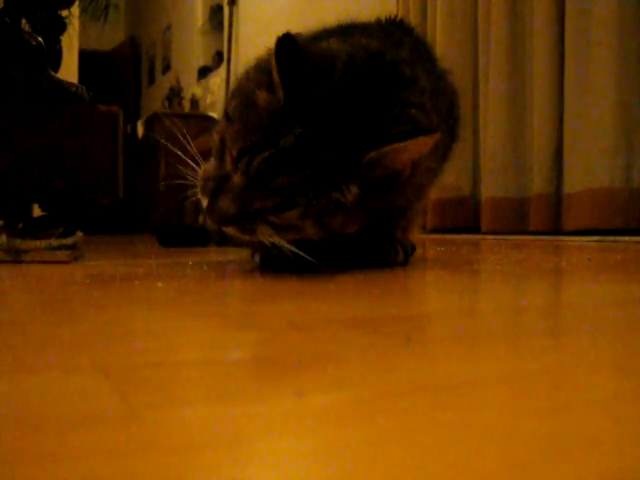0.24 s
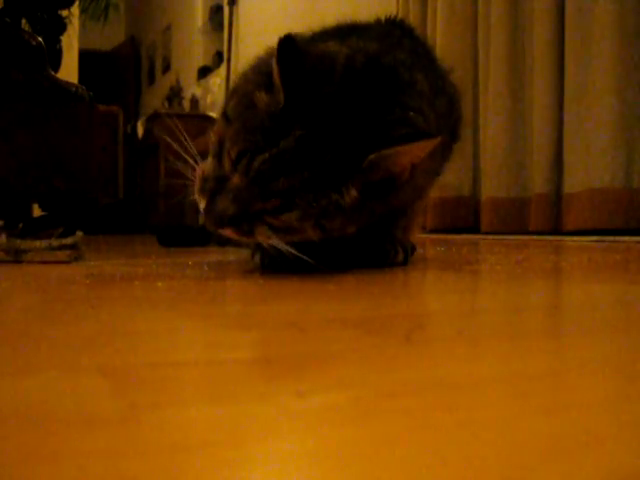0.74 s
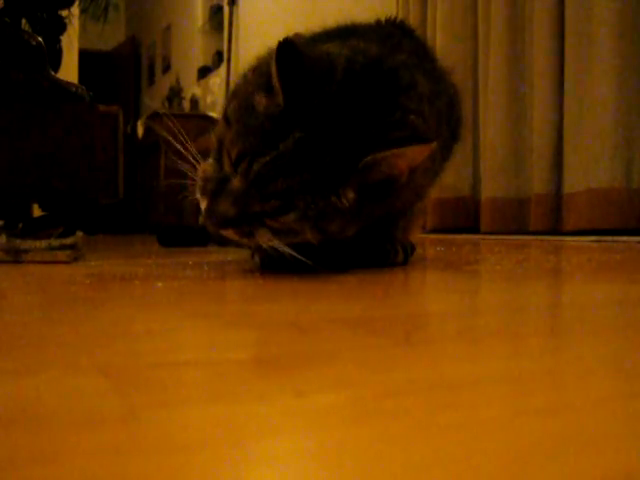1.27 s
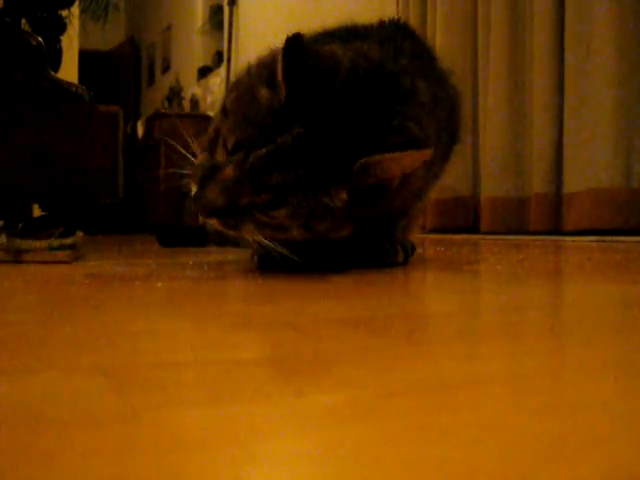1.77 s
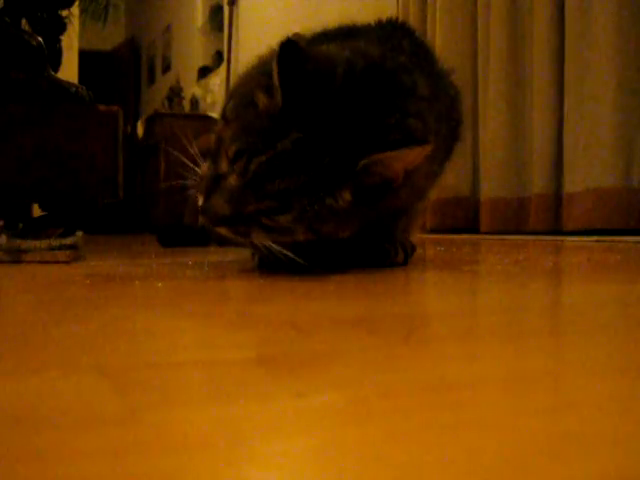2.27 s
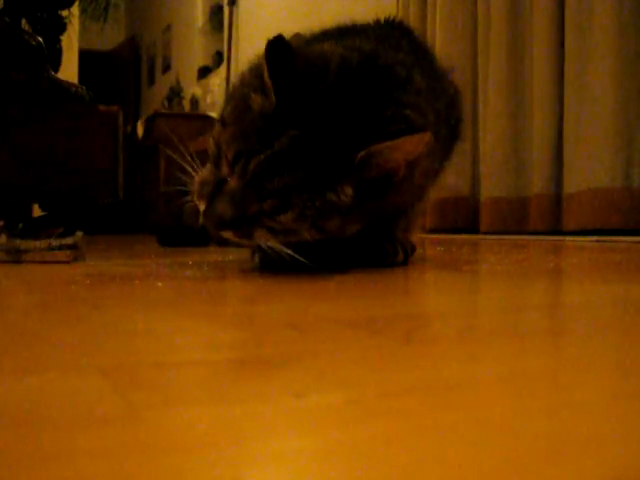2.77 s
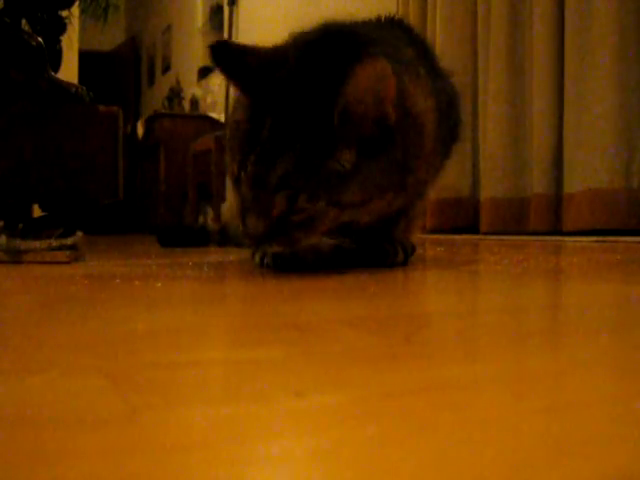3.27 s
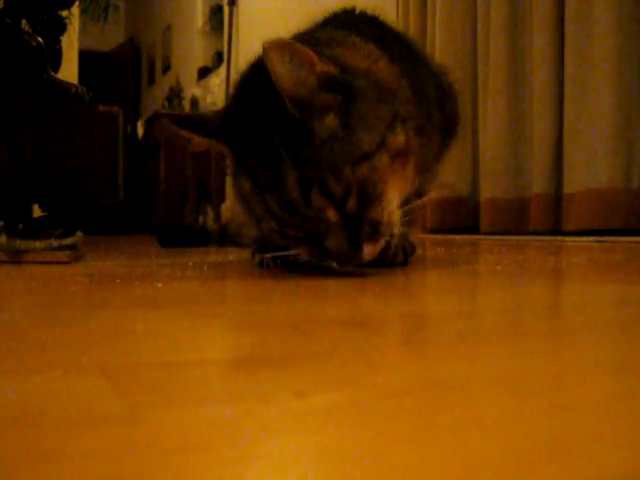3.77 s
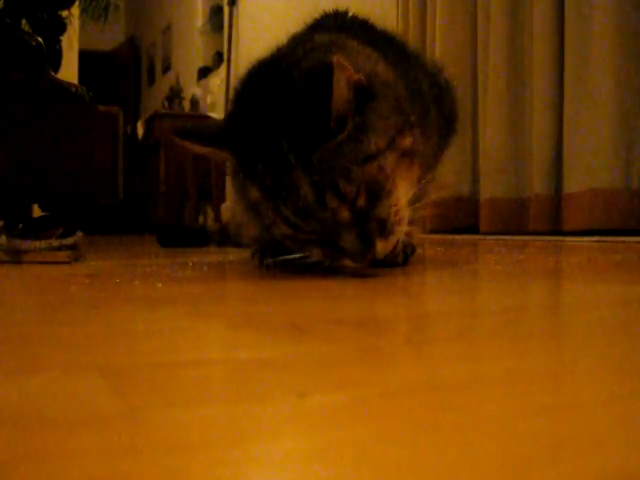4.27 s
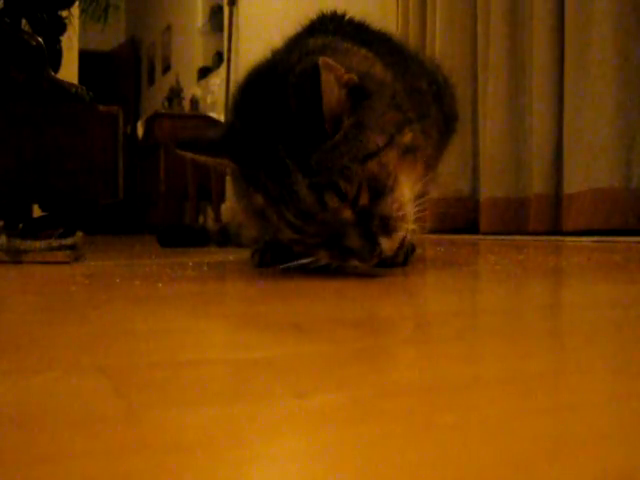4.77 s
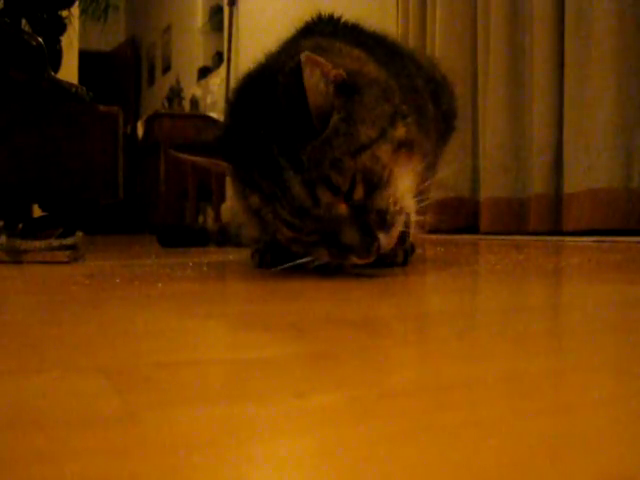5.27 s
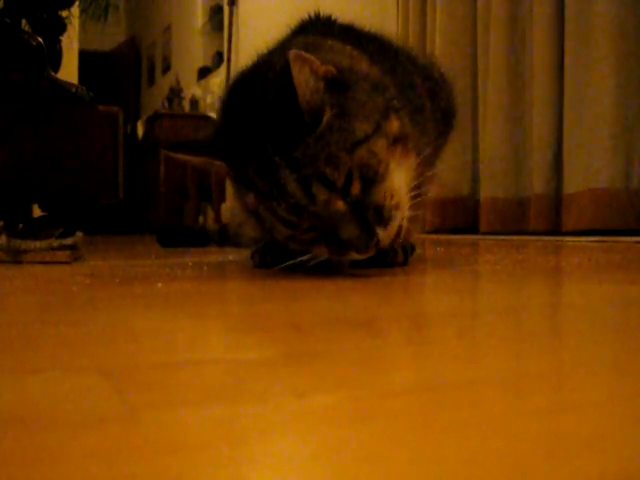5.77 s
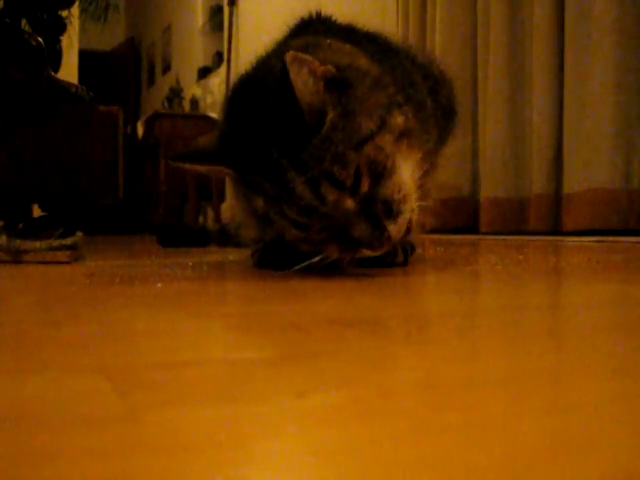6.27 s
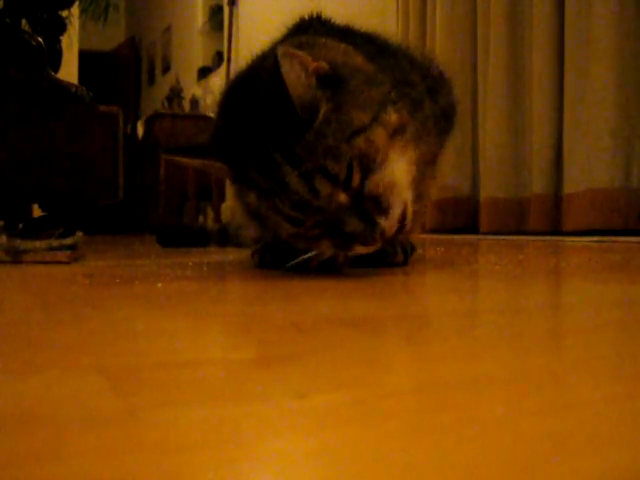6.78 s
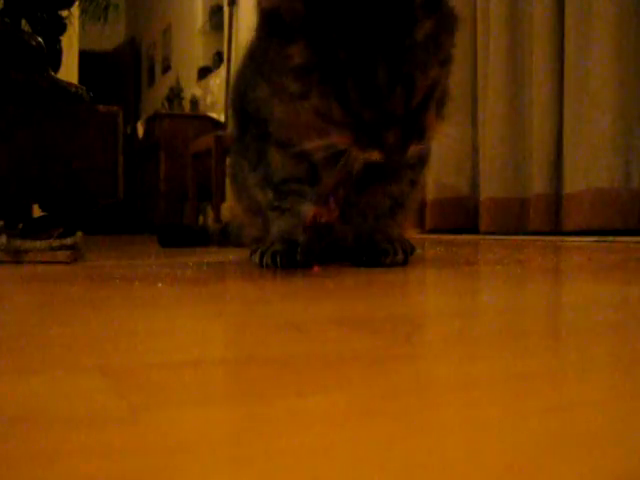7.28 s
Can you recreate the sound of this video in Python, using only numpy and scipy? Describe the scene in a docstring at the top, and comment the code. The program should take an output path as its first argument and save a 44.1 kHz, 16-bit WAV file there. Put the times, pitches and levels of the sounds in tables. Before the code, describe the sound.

Close, irregular wet chewing with brittle bone cracks and soft knocks, a brief early rub on floorboards, and low-grade steady hiss in a quiet room.

```python
"""A quiet room with a wooden floor; a cat chews its prey, close enough that direct sound outweighs the room.
Two or three bites a second: random clicks ringing the mouth make the wet crackle, small snaps the splinters.
Louder bones snap as one impulse among crumbling splinters; under some, the overloaded microphone thumps.
Jaw and prey knock softly; early on the prey rubs over the boards: dense little slips ring boards and fur.
Dull room noise with a faint whine lies under it; a small 8-bit camera adds a faint, gritty hiss."""
import sys
import numpy as np
from scipy import signal
from scipy.fft import rfft, irfft
from scipy.io import wavfile

SR = 44100
rng = np.random.default_rng(int(sys.argv[2]) if len(sys.argv) > 2 else 0)


def digitize_waveform(pressure):
    """Quantize a signal to 16-bit integers and store it at the path in sys.argv[1].

    Rows of a 2-D input are taken as channels; values are limited to [-1, 1].
    """
    field = np.atleast_2d(pressure).T
    bounded = np.clip(field, -1, 1)
    quanta = np.round(bounded * 32767).astype(np.int16)
    wavfile.write(sys.argv[1], SR, quanta)


N = 331632

# Levels are at the microphone, before the camera; those of sounds from the cat are also before the room.
# squeezes of the jaws: [start t/s, end t/s, crackle level/dB]
BITES = [(0.0, 0.109, -51), (0.401, 0.48, -52), (0.59, 0.709, -47.5), (1.138, 1.309, -49.5),
         (1.78, 1.901, -51.5), (1.978, 2.128, -56), (2.33, 2.461, -51.5), (3.001, 3.119, -51.5),
         (3.69, 3.867, -55.5), (3.87, 3.948, -48), (4.081, 4.139, -52.5), (4.201, 4.34, -50.5),
         (4.549, 4.798, -53.5), (4.871, 5.097, -54.5), (5.212, 5.29, -51.5), (5.579, 5.73, -53),
         (6.039, 6.221, -54.5), (6.521, 6.585, -53.5), (6.723, 6.827, -54.5), (7.249, 7.321, -55)]
# bones that break loudly: [break t/s, crumbling time/ms, mouth f/Hz, mouth level/dB, crack f/Hz, crack level/dB]
BONE_SNAPS = [(0.0615, 2.2, 1800, -37.5, 2820, -35.5), (0.4061, 0.11, 2100, -39.5, 3530, -51),
              (0.4879, 0.16, 1740, -47, 4300, -38), (0.6267, 1.7, 1905, -34.5, 2930, -50),
              (0.6391, 3.2, 2070, -34.5, 2800, -35.5), (0.662, 1.5, 1626, -33, 2900, -29.5),
              (0.6702, 0.43, 2000, -41, 3970, -37.5), (0.9739, 1.9, 2030, -39.5, 3430, -36.5),
              (1.1042, 0.22, 2200, -56, 3970, -36), (1.1515, 0.85, 2050, -33, 4320, -30.5),
              (1.1629, 2.3, 1770, -41, 4300, -36), (1.2382, 0.13, 1740, -46, 4190, -33.5),
              (1.2593, 1.14, 1410, -38.5, 4040, -36), (1.6914, .1, 2120, -40, 3200, -34.5),
              (1.86, 1.05, 1705, -24.5, 2880, -31.5), (1.9141, .25, 2000, -24.5, 2890, -22.5),
              (2.2721, .3, 2190, -49.5, 3980, -36.5), (2.3409, 0.091, 1760, -43, 3650, -40),
              (2.3733, 0.44, 1710, -44.5, 4260, -28), (2.4133, 0.96, 2030, -42, 3810, -38),
              (2.891, 0.084, 2480, -57, 3490, -35), (2.9, 0.097, 1830, -37, 2700, -52),
              (2.9622, 0.22, 1240, -37, 2780, -45.5), (3.0309, 1.07, 1950, -23, 4700, -34),
              (3.0915, 0.32, 2060, -36.5, 4750, -34.5), (3.2846, 1.1, 2090, -37, 5630, -33),
              (3.4763, 0.78, 1766, -33, 3520, -41), (3.7088, 0.84, 1850, -36, 3390, -39.5),
              (3.7819, 1.1, 1880, -38.5, 2660, -47), (3.8818, 1.74, 1785, -29.5, 3780, -26),
              (4.0588, 0.087, 2260, -42, 3220, -36.5), (4.2139, .4, 1750, -36, 3700, -50),
              (4.2959, 0.18, 1450, -42, 4620, -29.5), (4.566, .1, 2190, -40.5, 3730, -36),
              (4.7313, 0.16, 1800, -56, 4710, -33), (4.9803, 0.084, 1325, -37, 3100, -45.5),
              (5.0337, .3, 1790, -38.5, 5930, -36.5), (5.0473, 0.086, 1840, -39, 4660, -36.5),
              (5.0801, 1.3, 1850, -39.5, 4700, -35), (5.1134, .25, 2000, -25, 4630, -41),
              (5.2203, 1, 2075, -31.5, 2680, -34.5), (5.2336, 0.34, 2410, -44, 2840, -32),
              (5.2615, 0.74, 1450, -44.5, 3370, -42), (5.5145, .1, 2140, -45, 5870, -39.5),
              (5.5261, 1.3, 1850, -32.5, 4620, -29.5), (5.6835, 0.76, 2270, -28.5, 3840, -32),
              (5.699, 0.052, 2060, -46.5, 4600, -32.5), (5.729, 0.72, 1780, -42, 3800, -36),
              (6.1286, 0.86, 1910, -35.5, 4750, -45), (6.181, 0.23, 1780, -30.5, 4420, -33.5),
              (6.2355, 0.22, 1460, -35, 4520, -26.5), (6.5313, .1, 1710, -46, 4570, -37),
              (6.5772, .1, 1520, -49, 5100, -32), (6.5824, 0.12, 1910, -42.5, 4800, -27.5),
              (7.281, 0.21, 1725, -40.5, 3850, -40)]
# dull one-sided thumps of the overloaded microphone under some sharp snaps: [t/s, level/dB]
OVERLOAD_THUMPS = [(1.9156, -29.5), (2.375, -34), (3.032, -44), (4.2947, -31.5), (6.2354, -27),
                   (6.585, -35)]
# soft knocks of jaw and prey: [t/s, level/dB, f/Hz]
SOFT_KNOCKS = [(0.405, -44, 400), (0.663, -35.5, 314), (1.295, -40, 1005), (2.901, -41, 278),
               (2.961, -39, 225), (3.031, -29, 1020), (3.134, -35, 866), (5.237, -39, 944),
               (5.72, -33.5, 778), (6.729, -42, 746), (6.828, -40, 344)]
# tugs that drag the prey over the floor: [start t/s, end t/s, boards level/dB, fur level/dB]
TUGS = [(0.854, 1.028, -43.5, -46), (0.991, 1.097, -52, -44), (1.143, 1.552, -53.5, -54),
        (1.288, 1.376, -62, -42)]
# resonances of the floor: [f/Hz, width of a single pass/Hz, relative level/dB]
BOARD_MODES = [(300, 260, -4.5), (810, 750, -7.5)]
# broad resonances of the rustling fur: [f/Hz, width of a single pass/Hz, relative level/dB]
FUR_MODES = [(2520, 1400, -1), (4360, 3900, -6.5)]
# spectrum of the room noise: [f/Hz, relative level per Hz/dB]
ROOM_NOISE = [(20, -2), (130, -1.5), (350, -4), (850, -7), (1800, -13.5), (3000, -16), (6000, -26)]

# the share of a bite spent swelling and fading; the mouth's pitch
BITE_TAPER, MOUTH_HZ = .4, 1889
# level is over the bite's crackle; both scatters are random spreads, that of pitch as a share
SPLINTERS_PER_S, SPLINTER_DB, SPLINTER_SCATTER_DB = 27, 6, 2
SPLINTER_HZ, SPLINTER_SCATTER = 4440, .15
LEAD_S = .005  # the build-up before a bone breaks
TUG_ATTACK_S, TUG_RELEASE_S = 0.068, .025
# walls' tail and early scatter, against the direct sound
ROOM_DB, SCATTER_DB = -11, -13.5
HISS_DB = -50.5
# camera: sample rate, one 8-bit step, top of the passed band
CAMERA_SR, STEP, TOP_HZ = 16000, 1 / 128, 7500


def chewing(mouth_width_hz=850, fizz_hz=4000, fizz_width_hz=3200, fizz_db=-2, gentle_db=-52, gentle_rate=450):
    """Wet crackle swells and fades with each squeeze; the harder the squeeze, the denser it gets."""
    out = np.zeros(N)
    for start, end, db in BITES:
        n = max(int((end - start) * SR), 256)
        # clicks a second grow with the power of the bite
        rate = gentle_rate * undb(2 * (db - gentle_db))
        squeeze = signal.windows.tukey(n, BITE_TAPER)
        crackle = grains(n, rate, spread_db=5.5) * squeeze
        mouth = level(ring(crackle, MOUTH_HZ, mouth_width_hz, order=2), 0)
        fizz = level(ring(crackle, fizz_hz, fizz_width_hz, order=2), fizz_db)
        add(out, start, level(mouth + fizz, db))
    return out


def splinters(crumble_ms=.15, mouth_db=-4):
    """Small snaps at uneven moments through each bite, louder in a harder one."""
    out = np.zeros(N)
    for start, end, bite_db in BITES:
        count = max(round((end - start) * SPLINTERS_PER_S), 1)
        for k in range(count):
            # one at random in each equal share of the bite
            s = start + (end - start) * (k + rng.random()) / count
            db = bite_db + SPLINTER_DB + SPLINTER_SCATTER_DB * rng.standard_normal()
            detune = np.exp(SPLINTER_SCATTER * rng.standard_normal(2))
            mouth_hz, crack_hz = np.array([MOUTH_HZ, SPLINTER_HZ]) * detune
            add(out, s - LEAD_S, snap(crumble_ms, mouth_hz, db + mouth_db, crack_hz, db))
    return out


def snaps():
    """The bones that break loudly, each with its own crumbling, mouth ring and crack."""
    out = np.zeros(N)
    for s, *bone in BONE_SNAPS:
        add(out, s - LEAD_S, snap(*bone))
    return out


def snap(crumble_ms, mouth_hz, mouth_db, crack_hz, crack_db, mouth_q=1.45, crack_q=2.3, jaw_hz=800, jaw_width_hz=1050,
         crumb_share=1.6, lead_share=.45, jaw_db=-11.0, tick_hz=6300, tick_width_hz=2200, tick_db=-6):
    """Splinters build up, the bone breaks in one impulse, more splinters die away; mouth, bone and jaw ring."""
    lead = int(LEAD_S * SR)
    t = (np.arange(1024) - lead) / SR
    crumble_ms = max(crumble_ms, .1)
    fade_ms = np.where(t < 0, lead_share * (1 + crumble_ms), 1.9 * crumble_ms)
    push = grains(len(t), rate=5700, spread_db=0.5) * np.exp(-1000 * abs(t) / fade_ms)
    # the longer it crumbles, the more of the energy is in the splinters
    push *= crumb_share * crumble_ms / np.sqrt(np.sum(push ** 2) + 1e-6)
    push[lead] = 1  # the break itself
    mouth = burst(ring(push, mouth_hz, mouth_hz / mouth_q, order=4), mouth_db)
    crack = burst(ring(push, crack_hz, crack_hz / crack_q, order=2), crack_db)
    tick = burst(ring(push, tick_hz, tick_width_hz, order=2), crack_db + tick_db)
    jaw = burst(ring(push, jaw_hz, jaw_width_hz, order=2), mouth_db + jaw_db)
    return mouth + crack + tick + jaw


def overload_thumps(rise_s=0.0001, decay_s=0.0063):
    """Strong treble overloads the microphone preamp: a dull one-sided thump, quick onset, slower decay."""
    out, t = np.zeros(N), np.arange(2048) / SR
    thump = np.exp(-t / rise_s) - np.exp(-t / decay_s)
    for s, db in OVERLOAD_THUMPS:
        add(out, s, undb(db) * thump)
    return out


def knocks(decay_s=0.0018, ring_s=0.031, ring_db=-13, q=1.5):
    """Blunt, scuffing contacts as fading noise; the boards ring on briefly under them."""
    out, t = np.zeros(N), np.arange(4096) / SR
    fade = np.exp(-t / decay_s) + undb(ring_db) * np.exp(-t / ring_s)
    for s, db, hz in SOFT_KNOCKS:
        scuff = rng.standard_normal(len(t)) * fade
        add(out, s, burst(ring(scuff, hz, hz / q, order=2), db))
    return out


def rubbing():
    """Each tug builds up, holds and lets go; dense little slips sound in the boards and rustle in the fur."""
    out, t = np.zeros(N), np.arange(N) / SR
    starts, ends, *levels = np.transpose(TUGS)
    pulls = []
    for start, end in zip(starts, ends):
        build_up = np.clip((t - start) / TUG_ATTACK_S, 0, 1)
        let_go = np.exp(-np.maximum(t - end, 0) / TUG_RELEASE_S)
        pulls.append(build_up * let_go)
    for modes, tug_dbs in zip((BOARD_MODES, FUR_MODES), levels):
        slips = grains(N, rate=2800, spread_db=3.0)
        body = sum(undb(db) * ring(slips, hz, width, order=2) for hz, width, db in modes)
        drag = undb(tug_dbs) @ pulls  # overlapping tugs add up
        out += level(body, 0) * drag
    return out


def room(x, t60_s=.45, scatter_s=0.0088, gap_s=.003):
    """After a short gap, floor and furniture scatter the sound; the walls add a short tail."""
    t = np.arange(SR // 2) / SR
    tail, early = rng.standard_normal((2, len(t))) * (t > gap_s)
    tail *= np.exp(-np.log(1000) * t / t60_s)  # 60 dB down after t60_s
    early *= np.exp(-t / scatter_s)
    walls = undb(ROOM_DB) * tail / np.linalg.norm(tail)
    scatter = undb(SCATTER_DB) * early / np.linalg.norm(early)
    return x + signal.fftconvolve(x, walls + scatter)[:N]


def hiss(whine_hz=4140, whine_width_hz=130, whine_db=-68):
    """Dull, steady room noise, white noise shaped by its spectrum, with a faint narrow whine."""
    hz, db = np.transpose(ROOM_NOISE)
    f = np.maximum(np.fft.rfftfreq(N, 1 / SR), 1)
    shape = undb(np.interp(np.log(f), np.log(hz), db))
    noise = irfft(rfft(rng.standard_normal(N)) * shape, N)
    whine = ring(rng.standard_normal(N), whine_hz, whine_width_hz, order=2)
    return level(noise, HISS_DB) + level(whine, whine_db)


def grains(n, rate, spread_db):
    """Random tiny clicks, rate a second, a few of them much larger than the rest."""
    chance, size, sign = rng.random((3, n))
    clicks = chance < rate / SR
    gain = undb(-spread_db * np.log(np.maximum(size, .02)))
    return clicks * gain * np.sign(sign - .5)


def ring(x, hz, width, order=1):
    """A resonance, passed order times; more passes make steeper sides."""
    b, a = signal.iirpeak(min(hz, SR / 4), hz / width, fs=SR)
    for _ in range(order):
        x = signal.lfilter(b, a, x)
    return x


def undb(db):
    """Decibels to gain."""
    return 10 ** (np.asarray(db) / 20)


def level(x, db):
    """Set the rms level."""
    return x * undb(db) / np.sqrt(np.mean(x ** 2) + 1e-20)


def burst(x, db):
    """Give a short sound the energy of 5 ms at this rms level."""
    return x * undb(db) * np.sqrt(.005 * SR / (np.sum(x ** 2) + 1e-20))


def add(out, s, x):
    """Mix x in at time s, cut off at the end."""
    i = max(int(s * SR), 0)
    out[i:i + len(x)] += x[:max(N - i, 0)]


def scene():
    """The cat in the room, over the rubbing, the microphone's thumps and the hiss, which get no room."""
    cat = chewing() + splinters() + snaps() + knocks()
    without_room = overload_thumps() + rubbing() + hiss()
    return (room(cat) + without_room)[None]


def record(dry, droop_db=-5.0):
    """The camera stores coarse 8-bit samples: quiet sound flips between two steps, which makes a gritty hiss."""
    offset = -1.27 * STEP  # rests off-centre, so that small swings cross a step
    samples = signal.resample_poly(dry, CAMERA_SR, SR, axis=-1) + offset
    coarse = np.round(samples / STEP) * STEP
    stepped = signal.resample_poly(coarse, SR, CAMERA_SR, axis=-1)[:, :N]
    # the treble droops ever faster towards the cut-off, by droop_db at 6 kHz
    f = np.minimum(np.fft.rfftfreq(N, 1 / SR), CAMERA_SR / 2)
    soft = irfft(rfft(stepped) * undb(droop_db * (f / 6000) ** 8), N)
    low_pass = signal.ellip(8, .2, 70, TOP_HZ, fs=SR, output="sos")
    return signal.sosfilt(low_pass, soft)


dry = scene()
out = record(dry)
digitize_waveform(out)
```